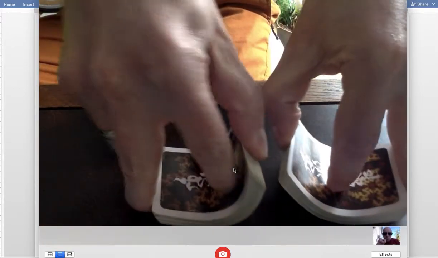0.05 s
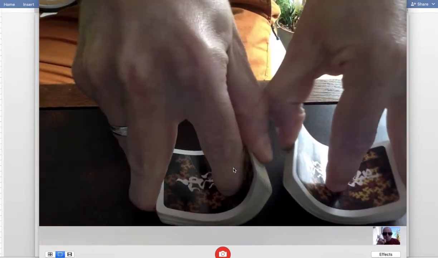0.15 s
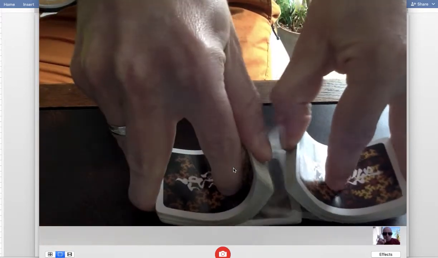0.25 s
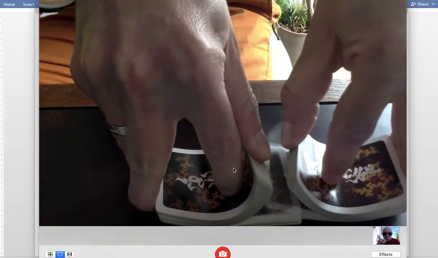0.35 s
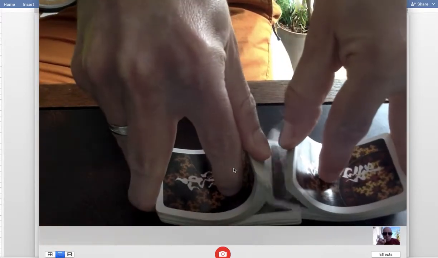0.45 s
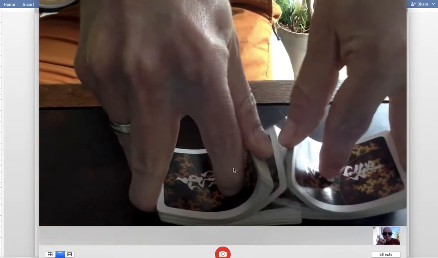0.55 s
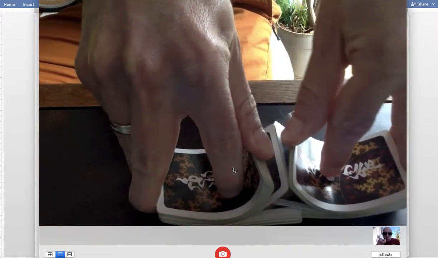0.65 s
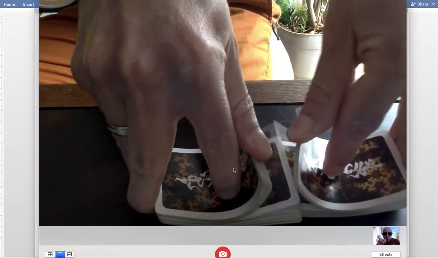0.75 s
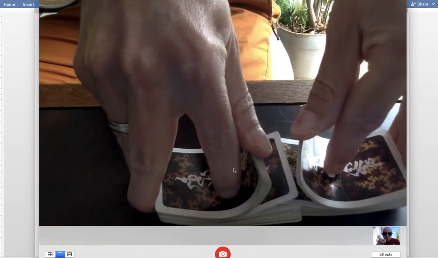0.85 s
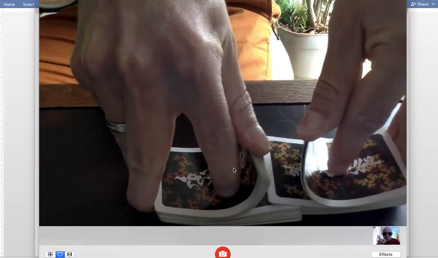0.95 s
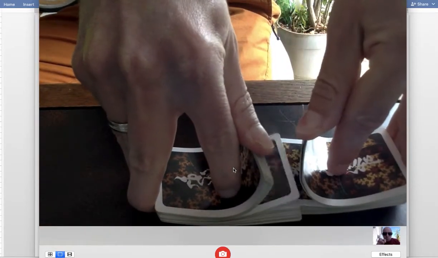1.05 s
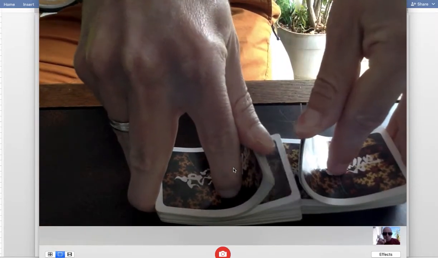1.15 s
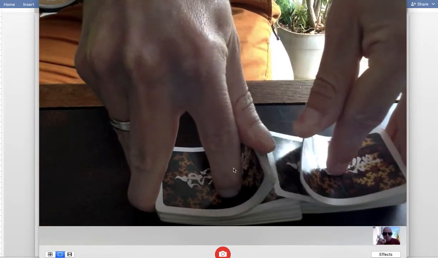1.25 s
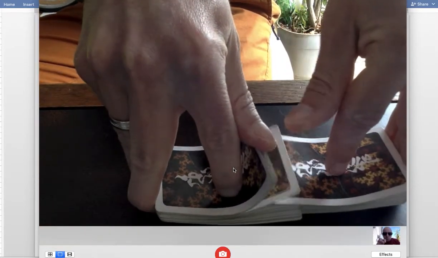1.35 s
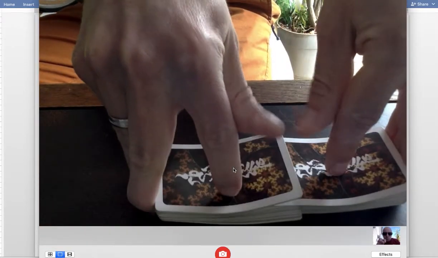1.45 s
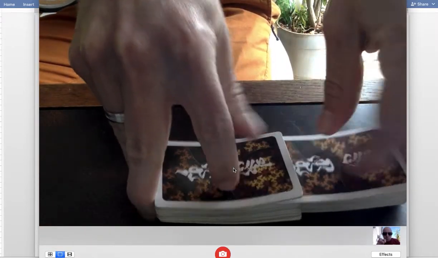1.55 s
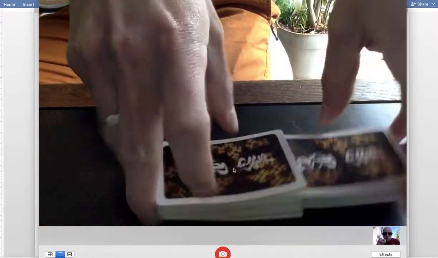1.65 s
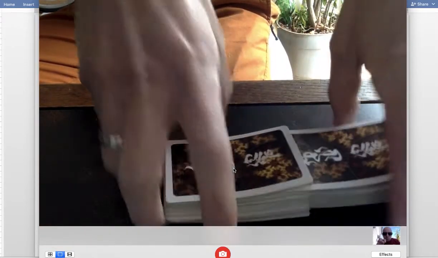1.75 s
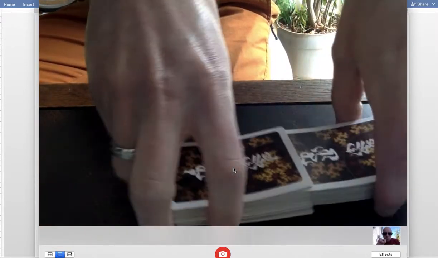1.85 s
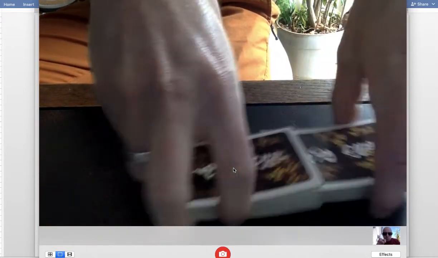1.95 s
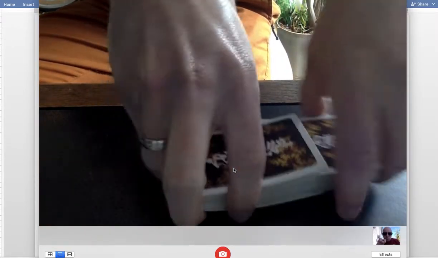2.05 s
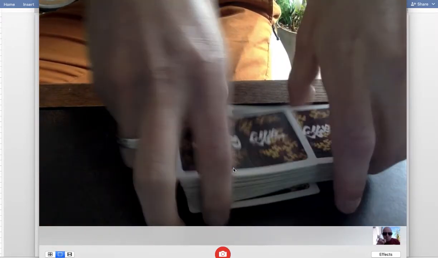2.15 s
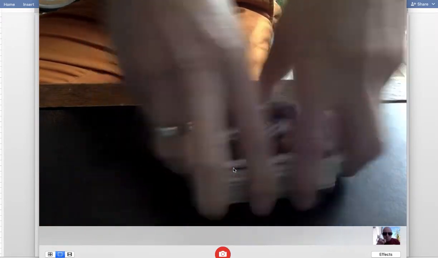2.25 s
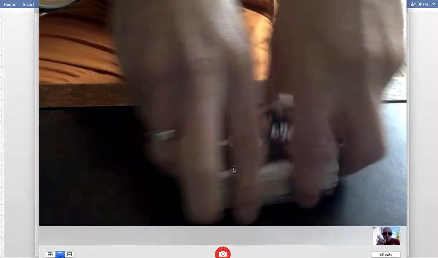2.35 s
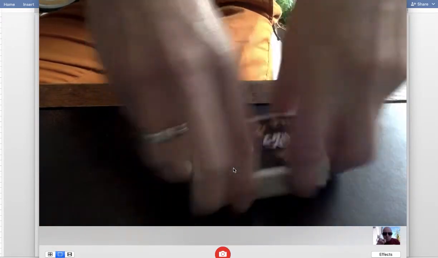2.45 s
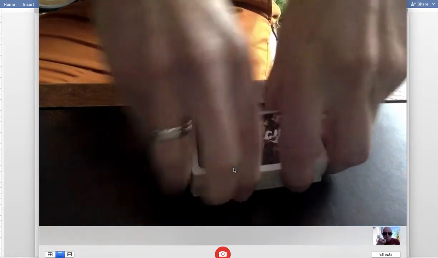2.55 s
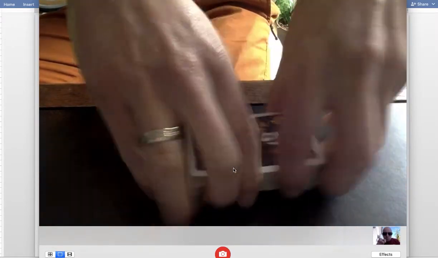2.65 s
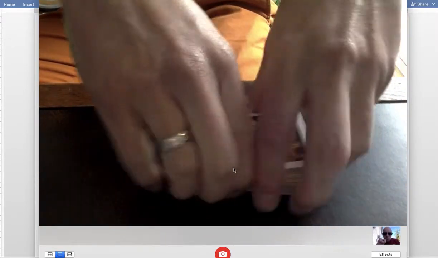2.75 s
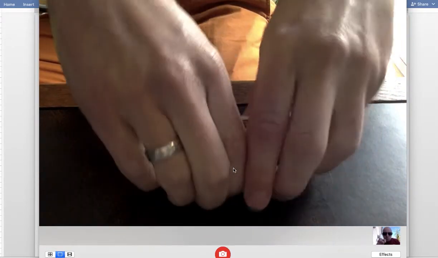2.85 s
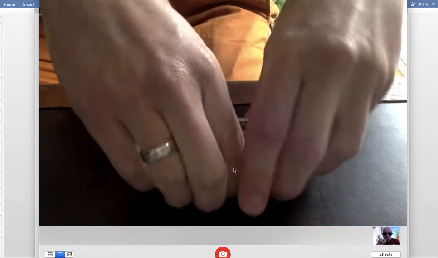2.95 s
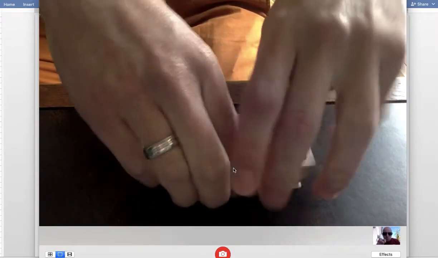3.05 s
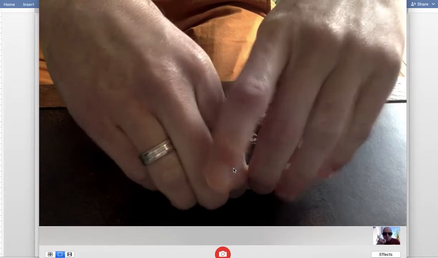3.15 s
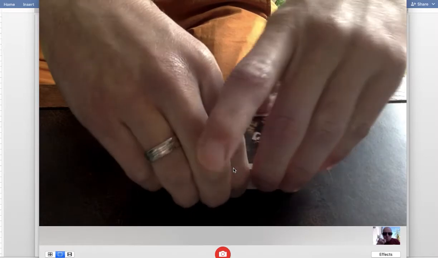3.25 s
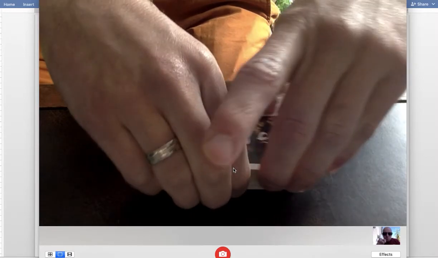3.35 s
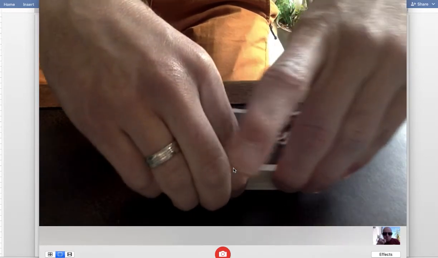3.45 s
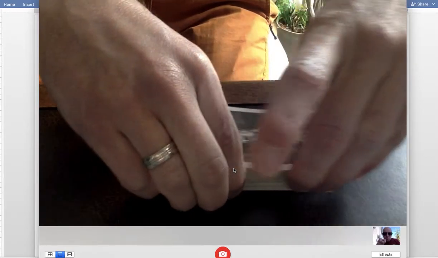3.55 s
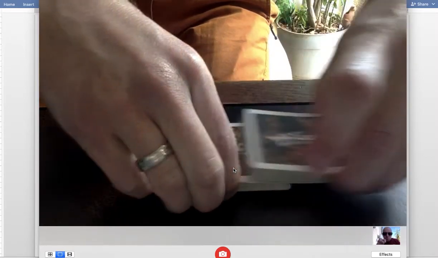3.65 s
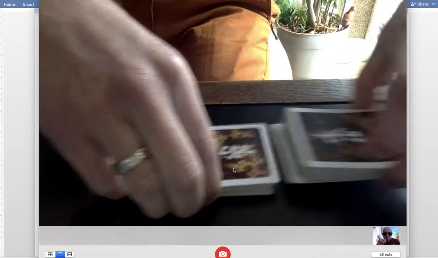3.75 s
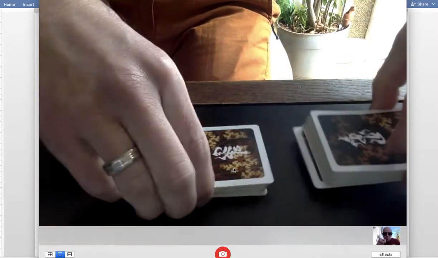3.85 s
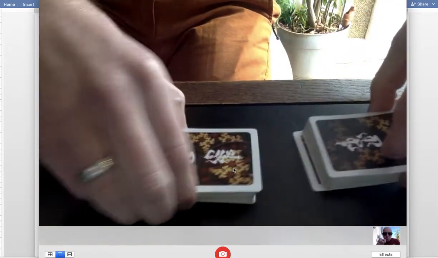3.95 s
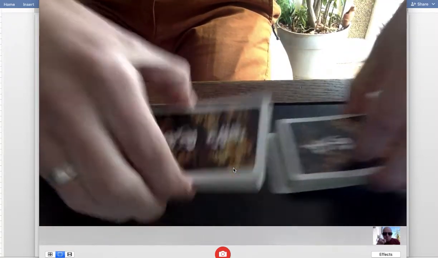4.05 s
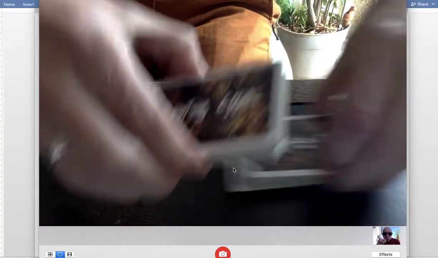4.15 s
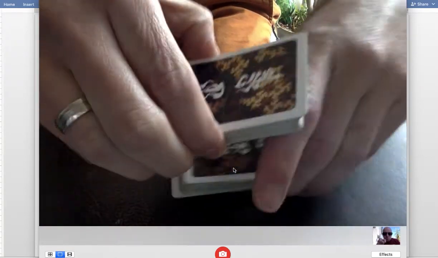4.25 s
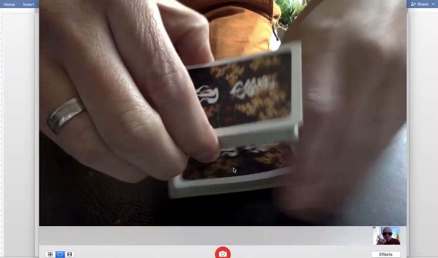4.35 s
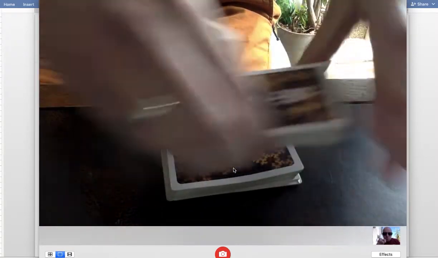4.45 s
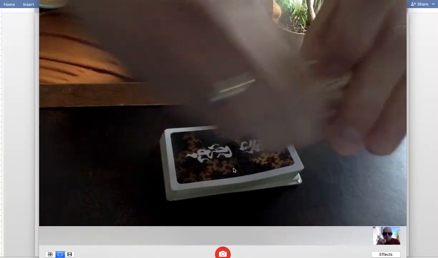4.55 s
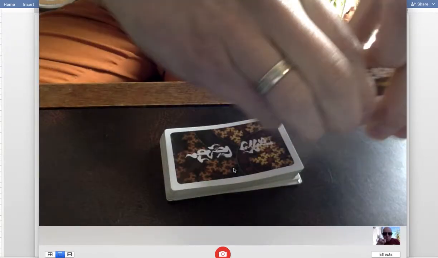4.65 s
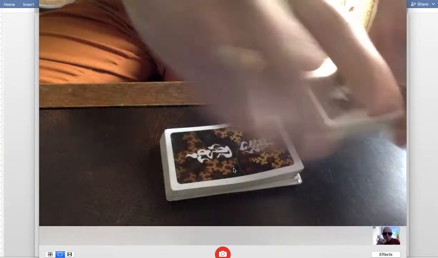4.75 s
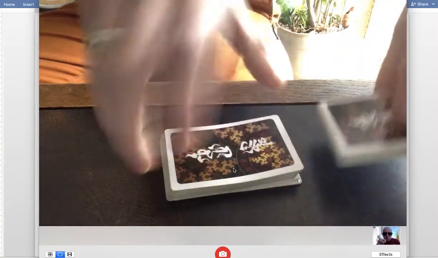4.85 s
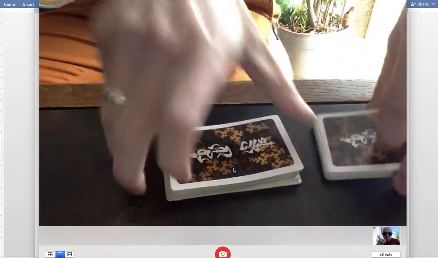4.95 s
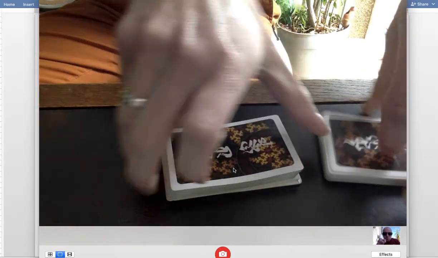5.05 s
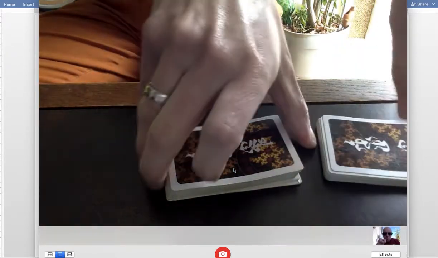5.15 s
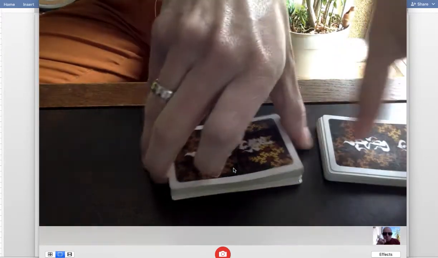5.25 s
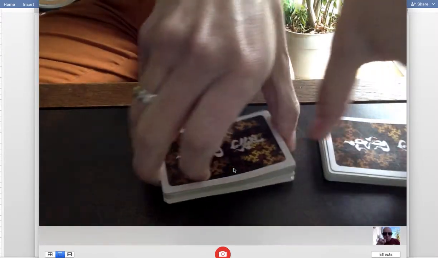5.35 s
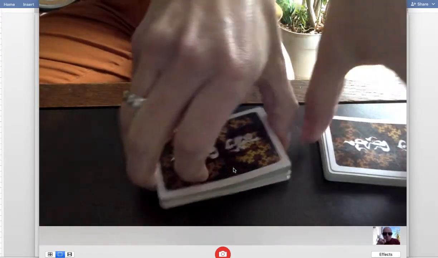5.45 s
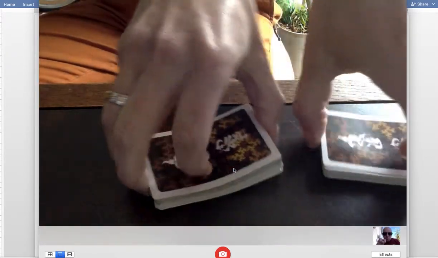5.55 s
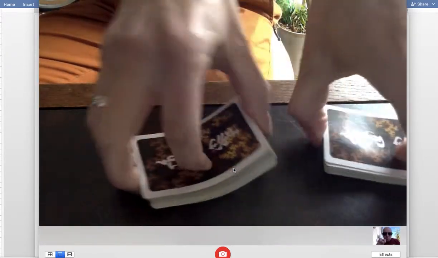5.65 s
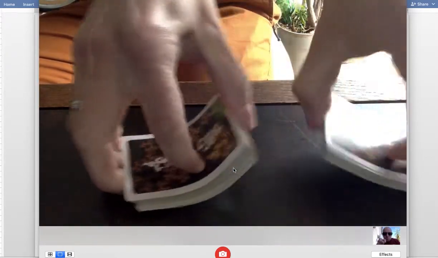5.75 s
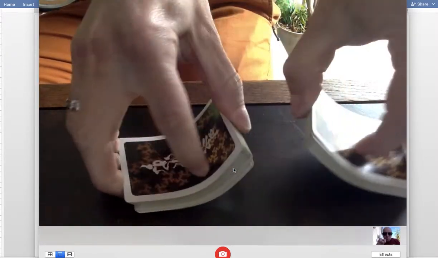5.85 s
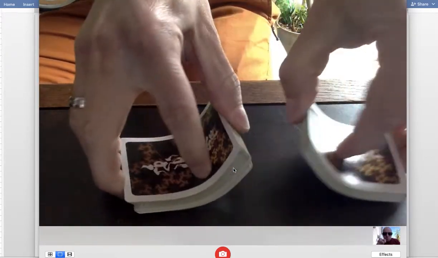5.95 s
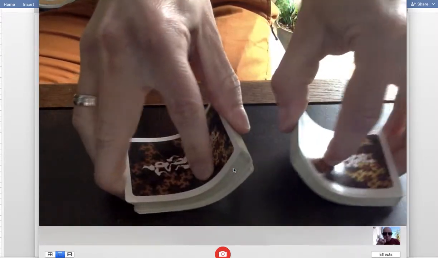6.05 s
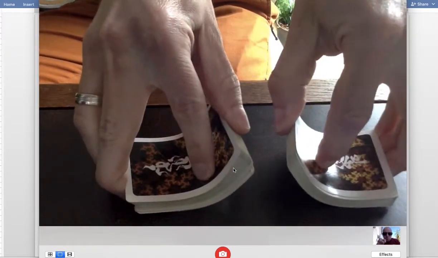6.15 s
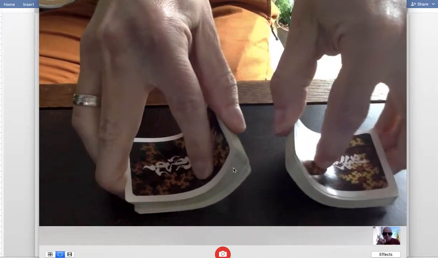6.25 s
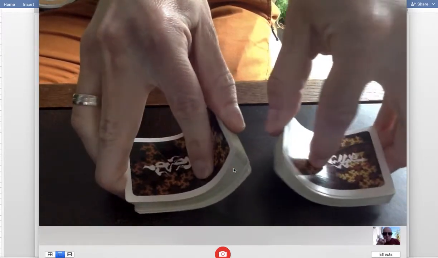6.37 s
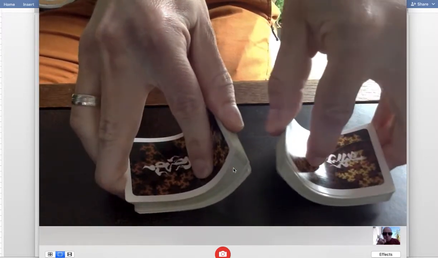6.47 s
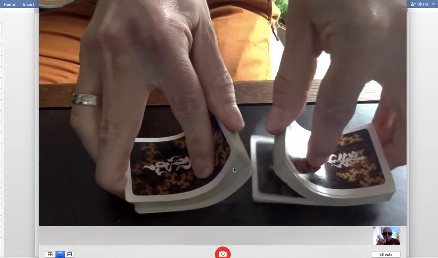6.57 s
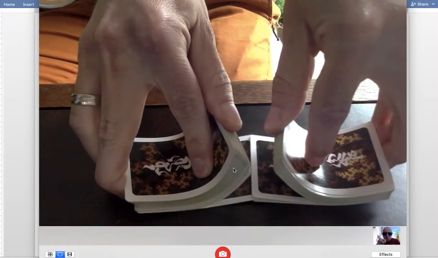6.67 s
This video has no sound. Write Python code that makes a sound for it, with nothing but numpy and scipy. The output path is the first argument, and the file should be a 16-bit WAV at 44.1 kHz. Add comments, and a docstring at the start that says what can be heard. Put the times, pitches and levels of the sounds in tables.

```python
"""Playing cards are riffled on a desk: each edge is a short noise burst that snaps off a thumb and slaps the pile.
The halves are pushed together, squared and cut, as filtered friction noise that follows the speed of the hand.
The packets land as noise clacks over damped desk modes, and a second riffle begins.
Near reflections, a small decaying room and a steady noise floor surround them.
The close microphone loses deep bass and overloads on the loudest snaps."""
import sys
import numpy as np
from scipy import signal
from scipy.fft import rfft, irfft
from scipy.io import wavfile
from scipy.ndimage import uniform_filter1d, map_coordinates

SR = 44100
rng = np.random.default_rng(int(sys.argv[2]) if len(sys.argv) > 2 else 0)


def dump(signal):
    """Clip the signal to [-1, 1] and save it as 16-bit WAV at the path in sys.argv[1]."""
    limited = np.clip(np.atleast_2d(signal).T, -1, 1)
    pcm = np.round(limited * 32767).astype(np.int16)
    wavfile.write(sys.argv[1], SR, pcm)


N = 295984  # length in samples


def amp(db):
    """Logarithmic level: decibels become an amplitude gain."""
    return 10 ** (np.asarray(db) / 20)


def unit(x):
    """Power normalisation: x is scaled to rms 1."""
    return x / np.sqrt(np.mean(x ** 2) + 1e-20)


def along(points, hz):
    """Logarithmic frequency scale: (f, value) points are interpolated at hz."""
    f, value = np.transpose(points)
    return np.interp(np.log(hz + 1), np.log(f + 1), value)


def wobble(rate):
    """Band-limited fluctuation: a smooth random curve with rate knots a second."""
    knots = rng.standard_normal(int(N * rate / SR) + 4)
    return map_coordinates(knots, [np.arange(N) * rate / SR])


def add(track, s, sound):
    """Superposition: a sound is summed into the track from time s."""
    i = int(np.clip(round(s * SR), 0, N - 1))
    track[i:i + len(sound)] += sound[:N - i]


def coloured(x, points, size=4096):
    """Minimum-phase filtering: x takes the given spectrum through a causal response of unit energy."""
    level_db = along(points, np.fft.rfftfreq(size, 1 / SR))
    cepstrum = irfft(np.log(amp(level_db)))
    # folding the cepstrum onto positive time makes the response causal
    cepstrum[1:size // 2] *= 2
    cepstrum[size // 2 + 1:] = 0
    response = irfft(np.exp(rfft(cepstrum)))
    return signal.fftconvolve(x, response / np.linalg.norm(response))[:N]


def burst(t, rise, fall, power=1):
    """Transient envelope: noise swells to rms 1 at t = 0 and dies away; a higher power cuts its tail shorter."""
    exponent = np.where(t < 0, (t / rise) ** 2, np.abs(t / fall) ** power)
    return np.exp(-exponent) * rng.standard_normal(len(t))


# spectrum of the background: f/Hz, relative level/dB
FLOOR_SPECTRUM = [(30, -6), (100, 0), (290, 1.5), (500, -14), (900, -4.5), (1150, -10.5), (1500, -7),
                  (1900, -11), (2700, -3), (4500, -14.5), (7500, -24.5), (15500, -16)]


def background(level_db=-69):
    """Stationary random noise: a quiet floor of fixed spectrum and level."""
    return amp(level_db) * coloured(rng.standard_normal(N), FLOOR_SPECTRUM)


# modes of the desk top before detuning, tilt and damping: f/Hz, relative level/dB, t60/s
DESK_MODES = [(101, -5, 0.2), (122, -4.5, .08), (148, -0.5, 0.12), (213, -5.5, .08), (270, -4.5, 0.099),
              (303.2, -2.5, 0.13), (343, -6, 0.045), (412, -5, 0.048), (574, -13, 0.055), (720, -17, 0.02)]


def thump(vary_db, attack, tilt_db, damping):
    """Modal superposition: a blow rings decaying desk modes, tilted per octave by hardness, damped by what rests there."""
    t = np.arange(SR // 4) / SR
    hz, db, t60 = np.transpose(DESK_MODES)[:, :, None]
    strength, detune, phase = rng.standard_normal((3, len(DESK_MODES), 1))
    octaves = np.log2(np.minimum(hz, 420) / hz[0])  # the tilt stops growing at 420 Hz
    level = db + vary_db * strength + tilt_db * octaves - 60 * damping * t / t60
    # the hands load the desk differently at every blow
    pitch = hz * (1 + 0.041 * detune)
    modes = amp(level) * np.sin(2 * np.pi * pitch * t + phase * np.pi)
    ring = np.sum(modes, axis=0) * (1 - np.exp(-t / attack))
    return ring / np.sqrt(np.mean(ring[:SR // 50] ** 2))  # rms 1 over the first 20 ms


# packets and fingers meeting the desk, before the overall gains and the common tilt:
# t/s, desk thump level/dB, hardness/(dB per octave), edge clack level/dB
KNOCKS = [(0.092, -53, 5, -79), (1.703, -50.5, 0, -55), (1.753, -32, 1, -35.5), (1.776, -30, -0.5, -34.5),
          (1.855, -31.5, -9, -33), (2.261, -26.5, -2.5, -28.5), (2.381, -32.5, -1.5, -49),
          (2.424, -33.5, 4.5, -36.5), (2.653, -36, 3.5, -34), (2.791, -32, 3, -36.5),
          (3.113, -39, -1.5, -35.5), (3.811, -53, 3, -56), (3.902, -41, 3.5, -43.5), (4.024, -44.5, 2, -45),
          (4.264, -40.5, -16, -62), (4.8897, -27, -0.5, -22.5), (4.897, -25, -2, -29),
          (4.931, -21, 12, -22.5), (5.01, -32.5, 9.5, -46), (5.065, -44.5, 2, -61), (5.118, -43.5, 6, -52),
          (5.147, -43.5, 16, -47), (5.188, -42, 12, -53), (5.233, -33, 0.5, -39), (5.304, -43.5, 3, -50.5),
          (5.453, -33, 2.5, -34.5), (5.483, -42.5, 10.5, -45), (5.897, -57, 7, -78)]
# spectrum of the edge clack: f/Hz, relative level/dB
CLACK_SPECTRUM = [(150, -2.5), (500, 2.5), (900, 5), (1600, -6), (2400, 5), (4200, 2), (5500, -11.5),
                  (7500, -30.5), (11000, -28.5), (15500, -29)]


def knocks():
    """Impact excitation: a packet's edges clack as its weight thumps the desk; returns (clacks, desk)."""
    clacks, desk = np.zeros((2, N))
    t = np.arange(SR // 16) / SR
    for s, thump_db, hardness_db, clack_db in KNOCKS:
        clack = burst(t - .001, rise=0.0015, fall=0.0042)
        blow = thump(vary_db=2.5, attack=0.0022, tilt_db=hardness_db - 1.2, damping=1.25)
        add(clacks, s, amp(clack_db) * clack)
        add(desk, s, amp(thump_db) * blow)
    return amp(3.5) * coloured(clacks, CLACK_SPECTRUM), amp(0.05) * desk


def nearby(x, first=.004, spread=0.0083, count=14):
    """Early reflection: weak, quick copies return from the hands, the desk and the things standing on it."""
    delays = first + spread * rng.random(count) ** 2  # s
    strengths = unit(rng.standard_normal(count)) / np.sqrt(count)
    response = np.bincount((delays * SR).astype(int), strengths)
    return signal.fftconvolve(x, response)[:N]


# decay of the room: f/Hz, t60/s
ROOM_DECAY = [(120, 0.31), (400, .28), (1200, 0.19), (3500, 0.22), (8000, 0.11), (15000, 0.049)]


def room(x, delay=0.0055, count=24):
    """Diffuse reverberation: each frequency decays at its own rate, with a fresh tail as the hands move."""
    wet = np.zeros(N)
    for part in np.array_split(np.arange(N), count):
        hz, t, z = signal.stft(rng.standard_normal(SR // 2), SR, nperseg=256)
        decay = amp(-60 * t / along(ROOM_DECAY, hz)[:, None])
        tail = signal.istft(z * decay, SR, nperseg=256)[1]
        answer = signal.fftconvolve(x[part], tail / np.linalg.norm(tail))
        add(wet, part[0] / SR + delay, answer)
    return wet


# cards snapping off the thumbs, levels before the overall gains:
# t/s, snap level/dB, brightness/dB, desk thump level/dB
SNAPS = [(0.2248, -3.5, -9, -30), (0.2466, -12.5, 4, -22), (0.2584, 3, 4, -27), (0.2785, -11, -3, -26),
         (0.3005, -4.5, 4, -22), (0.319, -17, 0.5, -36), (0.3427, -11.5, 3, -20), (0.36, -9.5, 0.5, -26.5),
         (0.379, -11, 6, -32.5), (0.3873, -2.5, 6, -33.5), (0.403, -8.5, 5.5, -31), (0.413, -10, -3, -32),
         (0.438, -14, 3.5, -33), (0.4582, -10, -7.5, -31), (0.4792, -11.5, 3.5, -33),
         (0.4895, -16, 3, -27.5), (0.5214, -1, 7, -31), (0.5503, -12, 6, -36), (0.5546, -8, 0.5, -34),
         (0.6017, -5.5, 3.5, -29), (0.6375, -9, 1.5, -32.5), (0.6664, -16.5, 0, -34.5),
         (0.715, -4.5, 8.5, -22.5), (0.7294, -12, 0, -31), (0.7851, -6, 4.5, -31.5),
         (0.7924, -3, 7.5, -31.5), (0.8964, -5.5, 7, -21), (0.9006, -5, 0.5, -21.5),
         (1.0249, -9, 3.5, -31.5), (1.0601, -19, 2, -29.5), (1.102, -17, 1.5, -30.5),
         (1.1829, -12.5, 7, -31.5), (1.1871, -11, 1.5, -28), (1.2643, -3, 4, -25.5),
         (1.2826, -2, 9.5, -26.5), (1.288, -8.5, 9, -28), (1.304, -1.5, 5.5, -33.5),
         (1.3398, -17, 10.5, -42.5), (1.3651, -12, 7.5, -31.5), (1.3708, -12, -1.5, -32),
         (1.3912, -4.5, 6, -28.5), (1.3966, -9, 4.5, -42.5), (1.853, -16.5, -12, -36.5),
         (6.5225, -22, -6, -30), (6.5667, -11, 7, -30), (6.594, -2.5, 12.5, -40),
         (6.7018, -22.5, 12, -40.5), (6.7065, -18.5, 2.5, -26)]
# spectrum common to the snaps: f/Hz, relative level/dB
SNAP_SPECTRUM = [(80, -20.5), (300, -8.5), (620, -8.5), (900, -3), (1300, -6.5), (1800, -9.5), (2400, -2),
                 (2850, -4), (3700, -1.5), (4700, -7.5), (5800, -4.5), (7700, -15.5), (11000, -5),
                 (15500, -3.5)]
# every card swells and is stopped by the pile alike
SNAP_RISE_S, SNAP_DECAY_S, SNAP_FALL_POWER = .0019, 0.0027, 1.6
# the bend runs back along the card: strength, and range of its travel time
BEND_ECHO, BEND_TRIP_S = .4, (.00015, .0009)


def riffle(lead=.0035, lead_db=-17, landing=0.0011, settle_db=-23, flick_db=-19):
    """Elastic release: each card scrapes the thumb, snaps free, slaps the pile and settles; returns (snaps, desk)."""
    dull, bright, scrapes, desk = np.zeros((4, N))
    before = .012  # s of each sound ahead of its snap
    t = np.arange(SR // 7) / SR - before
    for s, db, bright_db, thump_db in SNAPS:
        snap = burst(t + 0.0003, rise=SNAP_RISE_S, fall=SNAP_DECAY_S, power=SNAP_FALL_POWER)
        snap += amp(settle_db) * burst(t - .004, rise=0.0032, fall=0.019)
        # its far corner flicks down a moment later
        snap += amp(flick_db) * burst(t - rng.uniform(0.0053, 0.02), rise=0.0007, fall=0.0025)
        # every card is gripped at another length and so has its own colour
        trip = int(rng.uniform(*BEND_TRIP_S) * SR)
        echo = rng.choice([-1, 1]) * BEND_ECHO * np.roll(snap, trip)
        snap = (snap + echo) / np.hypot(1, BEND_ECHO)
        # share of power given to the bright part: half at a brightness of 2 dB
        share = 1 / (1 + amp(2 - bright_db) ** 2)
        add(dull, s - before, amp(db) * np.sqrt(2 * (1 - share)) * snap)
        add(bright, s - before, amp(db) * np.sqrt(2 * share) * snap)
        scrape = burst(t + lead, rise=0.0012, fall=0.001)
        add(scrapes, s - before, amp(db + lead_db) * scrape)
        blow = thump(vary_db=1.5, attack=.0012, tilt_db=4.0, damping=1.1)
        add(desk, s + landing, amp(thump_db) * blow)
    # stiffly bent cards put more of their snap above the 7500 Hz split:
    # low-passed dull plus the complementary high-passed bright
    snaps = signal.lfilter(*signal.butter(1, 7500, fs=SR), dull - bright) + bright
    # only the thin edge moves while it scrapes, so it has little bass
    snaps += signal.lfilter(*signal.butter(3, 2600, "highpass", fs=SR), scrapes)
    # the edge chatters as it lets go
    chatter = amp(3.2 * wobble(1800))
    return amp(3.0) * coloured(snaps * chatter, SNAP_SPECTRUM), amp(-3.0) * desk


FASTEST_AT = 0.44  # share of a stroke at which the hand is fastest
SPEED_POWER = 1.56  # loudness grows as this power of speed


def strokes(rows):
    """Speed-dependent friction: sound follows a hand that speeds up and slows to rest; one gain per level column."""
    power = np.zeros((len(rows[0]) - 2, N))
    for start, length, *levels in rows:
        t = np.arange(int(length * SR)) / SR
        progress = np.interp(t, [0, FASTEST_AT * length, length], [0, .5, 1])
        speed = np.abs(np.sin(np.pi * progress))
        for track, db in zip(power, levels):
            # overlapping strokes add in power
            add(track, start, (amp(db) * speed ** SPEED_POWER) ** 2)
    return np.sqrt(power)


def friction(colour, rate, grain_db, flutter_db, patchy_db):
    """Stick-slip friction: many tiny slips and a few larger ones, over a rub whose resonances shift with the grip."""
    happens = rng.random(N) < rate / SR  # rate in slips a second
    slips = happens * rng.choice([-1, 1], N) * amp(8 * rng.uniform(-1, 1, N))
    rub = unit(rng.standard_normal(N) + amp(grain_db) * unit(slips))
    # random gains, smoothed over frequency and time
    z = signal.stft(rub, nperseg=256)[2]
    grip = uniform_filter1d(rng.standard_normal(z.shape), size=3, axis=0)
    grip = uniform_filter1d(grip, size=14, axis=1)
    rub = signal.istft(z * amp(patchy_db * unit(grip)), nperseg=256)[1][:N]
    return unit(coloured(rub, colour) * amp(flutter_db * wobble(140)))


# packets dragged over the desk: start t/s, length/s, peak level/dB
DRAGS = [(1.4, 0.42, -62), (1.8, 0.28, -56), (2.17, 0.38, -47), (2.59, .18, -40), (3.62, 0.21, -60.5),
         (3.85, 0.085, -57), (4.0, .16, -42), (4.1, 0.28, -61.5)]
# strokes of card over card, pushed together, squared, cut, set down and bent for the next riffle:
# start t/s, length/s, peak level of the edges' rasp/dB, peak level of the faces before the touch split/dB
SLIDES = [(1.62, 0.14, -49.5, -52.5), (1.785, 0.1, -38.5, -36), (1.87, .25, -40.5, -29.5),
          (2.05, 0.094, -47.5, -54), (2.17, 0.092, -35, -21.5), (2.235, 0.18, -45, -46.5),
          (2.403, 0.08, -38.5, -33.5), (2.522, 0.1, -42.5, -46.5), (2.6, .13, -32, -39.5),
          (2.69, 0.24, -55, -74), (2.92, 0.11, -55.5, -60), (2.98, 0.16, -66, -63),
          (3.38, .31, -71.5, -54.5), (3.61, 0.19, -67, -65), (4.01, 0.17, -43, -62), (4.06, .2, -53.5, -62),
          (4.245, 0.048, -50, -56), (4.288, 0.039, -61.5, -43), (4.3, .5, -68.5, -83),
          (4.52, .065, -75, -57.5), (4.66, .04, -69, -59), (4.945, 0.091, -51.5, -48),
          (5.13, .085, -57, -68), (5.385, 0.066, -55.5, -74), (5.455, 0.14, -62, -63),
          (5.65, 0.17, -55.5, -71), (5.75, 0.22, -67, -81.5), (6.02, 0.1, -60, -49), (6.29, .08, -74, -68)]
# friction spectra of dragged packet, edges, firm faces and barely touching faces: f/Hz, relative level/dB
DRAG_SPECTRUM = [(60, -15), (150, -1), (330, 5), (460, -7.5), (650, -8), (900, -10.5), (2000, -15.5),
                 (8000, -43.5)]
RASP_SPECTRUM = [(60, -25), (130, -2.5), (310, 7), (520, -4.5), (900, -2), (1700, -4), (2400, 5.5),
                 (3900, 2.5), (5000, -8.5), (6300, -20), (7800, -30), (15000, -25.5)]
HISS_SPECTRUM = [(2000, -38), (4500, -10), (5800, -5.5), (7800, -14.5), (9500, -7), (11500, -3.5),
                 (15500, -4)]
WHISPER_SPECTRUM = [(2000, -38), (5000, -16), (7500, -31.5), (10000, -17), (11500, -5), (12800, -7),
                    (14500, 1), (15800, -2.5)]
# face level at which hiss and whisper share power equally, and how abruptly the hiss fills out there
FIRM_DB, FIRM_POWER = -35, .5


def slides():
    """Sliding contact: edges rasp and faces hiss as packets are pushed, squared and drawn apart; the desk hums."""
    edges, faces = strokes(SLIDES)
    weight, = strokes(DRAGS)
    # a light touch mostly whispers; a firm one presses the faces flat and fills out the hiss
    firm = 1 / (1 + (amp(FIRM_DB) / (faces + 1e-9)) ** (2 * FIRM_POWER))
    rasp = friction(RASP_SPECTRUM, rate=350, grain_db=-2, flutter_db=2.0, patchy_db=4.5)
    hiss = friction(HISS_SPECTRUM, rate=1000, grain_db=0, flutter_db=2.0, patchy_db=5.5)
    whisper = friction(WHISPER_SPECTRUM, rate=1100, grain_db=-3, flutter_db=3.0, patchy_db=4.5)
    drag = friction(DRAG_SPECTRUM, rate=390, grain_db=-4.5, flutter_db=3.0, patchy_db=5.0)
    face_sound = faces * (np.sqrt(firm) * hiss + np.sqrt(1 - firm) * whisper)
    return edges * rasp + face_sound + weight * drag


# card corners catching on each other, before the overall gain: t/s, level/dB
TICKS = [(1.607, -44), (1.805, -32), (2.567, -35), (2.684, -35), (2.961, -41), (3.403, -37.5), (3.657, -46),
         (4.031, -43), (4.249, -47), (4.897, -32), (4.939, -31), (4.991, -33)]
# spectrum of one corner: f/Hz, relative level/dB
CORNER_SPECTRUM = [(1000, -38), (4000, -16.5), (8000, -21), (10500, 4), (14000, 14)]


def ticks():
    """Impulsive contact: single card corners give thin, short clicks."""
    track = np.zeros(N)
    t = np.arange(SR // 50) / SR
    for s, db in TICKS:
        click = burst(t - .001, rise=.0005, fall=.002)
        add(track, s, amp(db) * click)
    return amp(4.5) * coloured(track, CORNER_SPECTRUM)


# soft swish as the cut packet is swept aside; times after the first are counted from its start
SWISH_S, SWISH_DB, SWISH_RISE_S, SWISH_HOLD_S, SWISH_FADE_DB_PER_S = 4.325, -48.5, 0.041, 0.087, 148
SWISH_FROM_HZ, SWISH_TO_HZ, SWISH_SLOWS_AFTER_S, SWISH_SLOWING_S = 2130, 1560, 0.033, 0.014


def swish(width_hz=400, widening=2.2, flutter_db=3.5):
    """Narrow-band modulation: a noise band about a carrier sinks and narrows as the sweep slows."""
    t = np.arange(N) / SR - SWISH_S
    speed = (1 - np.tanh((t - SWISH_SLOWS_AFTER_S) / (2 * SWISH_SLOWING_S))) / 2
    hz = SWISH_TO_HZ + (SWISH_FROM_HZ - SWISH_TO_HZ) * speed
    fade_db = SWISH_FADE_DB_PER_S * np.maximum(t - SWISH_HOLD_S, 0)
    db = SWISH_DB - fade_db + flutter_db * wobble(90)
    # noise read faster makes a wider band
    travel = np.cumsum(2 * width_hz * (hz / SWISH_TO_HZ) ** widening) / SR
    a, b = [map_coordinates(rng.standard_normal(N), [travel], order=1) for _ in range(2)]
    phase = 2 * np.pi * np.cumsum(hz) / SR
    band = unit(a * np.cos(phase) + b * np.sin(phase))
    return np.clip(t / SWISH_RISE_S, 0, 1) * amp(db) * band


def scene():
    """Superposition of direct, early and reverberant sound: cards and desk in a quiet room."""
    floor = background()
    clacks, thumps = knocks()
    snaps, patter = riffle()
    cards = snaps + slides() + ticks() + swish()
    desk = patter + thumps
    early = amp(-15.5) * nearby(cards + clacks)
    late = room(amp(-20) * cards + amp(-17.0) * clacks + amp(-13.5) * desk)
    return (cards + clacks + desk + early + late + floor)[None]


def record(dry, bass_hz=78, top_hz=15900):
    """Transducer overload: the microphone thins deep bass, saturates on the loudest snaps and limits the band."""
    thin = signal.sosfilt(signal.butter(4, bass_hz, "highpass", fs=SR, output="sos"), dry)
    clipped = thin / (1 + np.abs(thin) ** 10) ** (1 / 10)
    # 0.3 dB ripple below the limit, 70 dB rejection above it
    band_limit = signal.ellip(10, .3, 70, top_hz, fs=SR, output="sos")
    return signal.sosfilt(band_limit, clipped)


dry = scene()
out = record(dry)
dump(out)
```